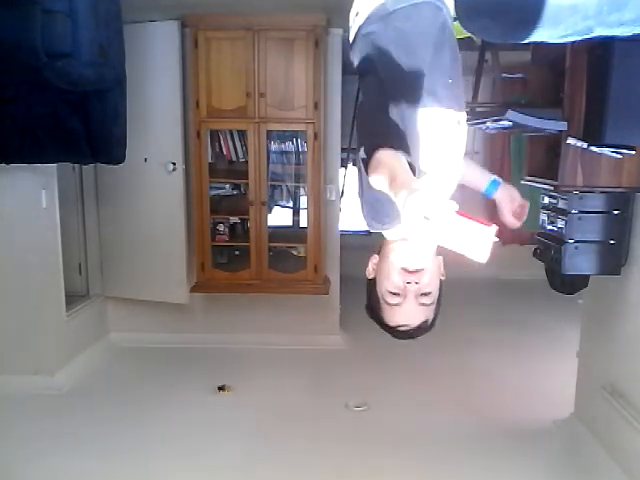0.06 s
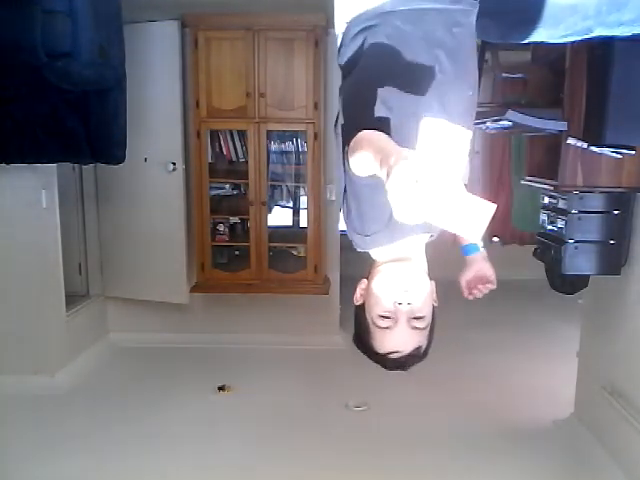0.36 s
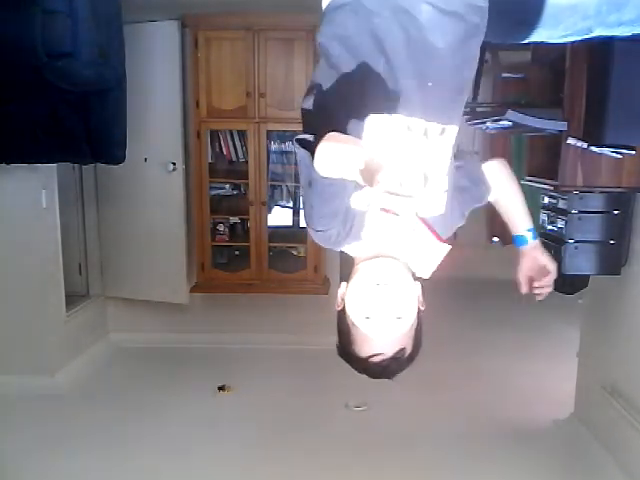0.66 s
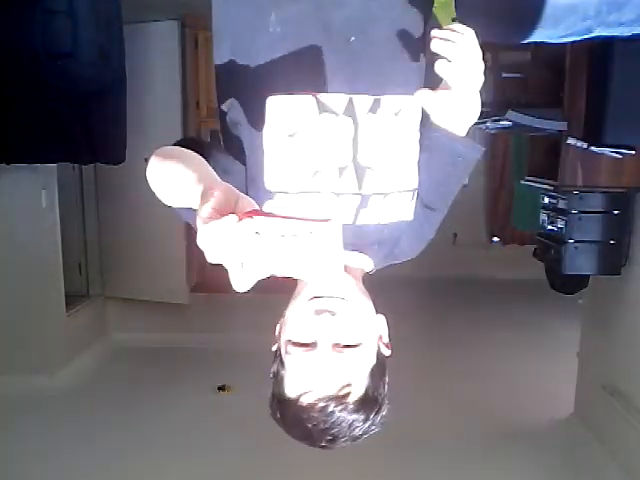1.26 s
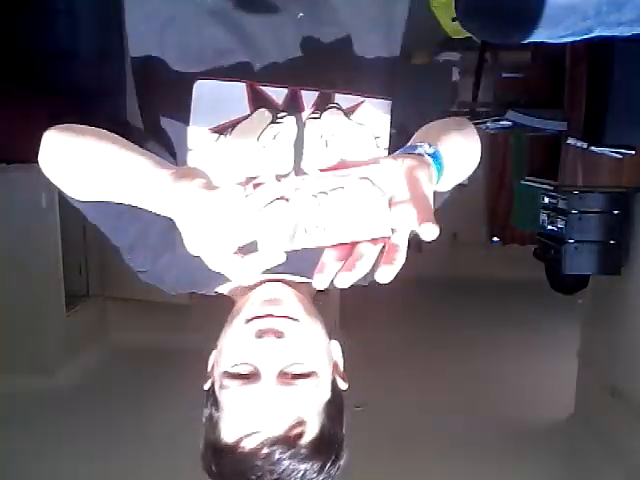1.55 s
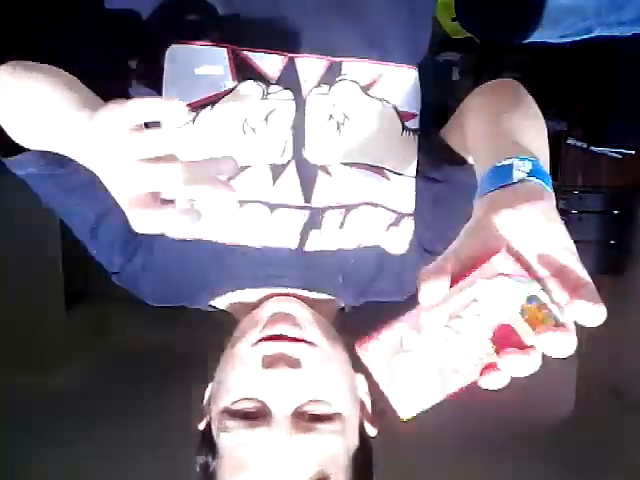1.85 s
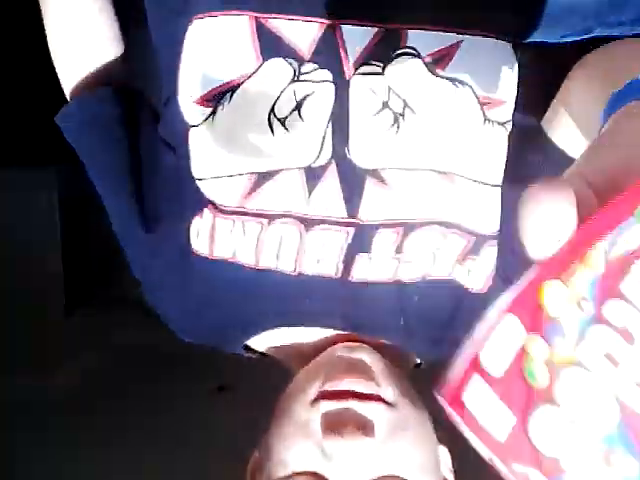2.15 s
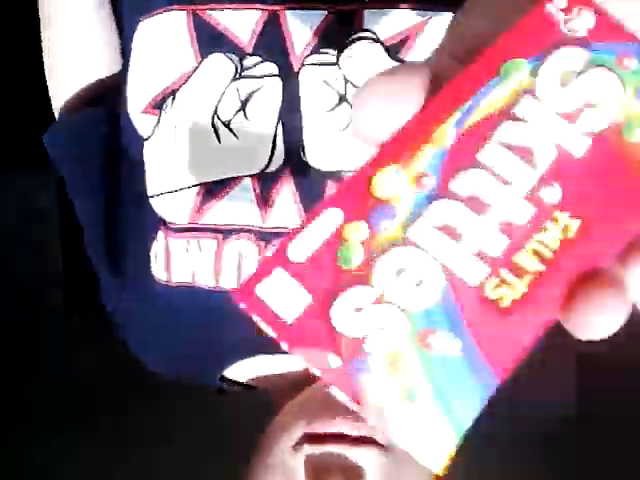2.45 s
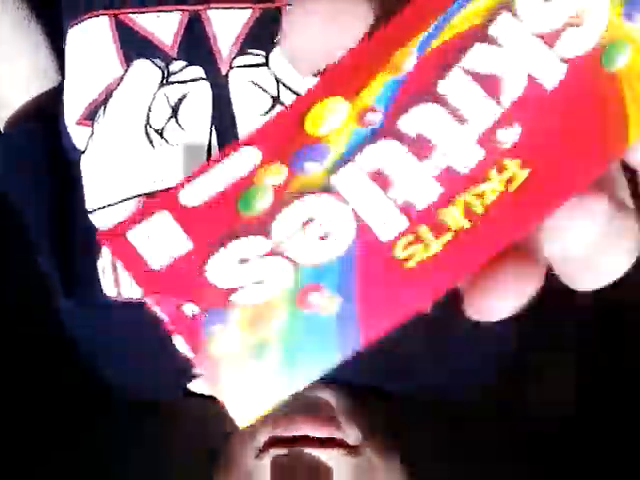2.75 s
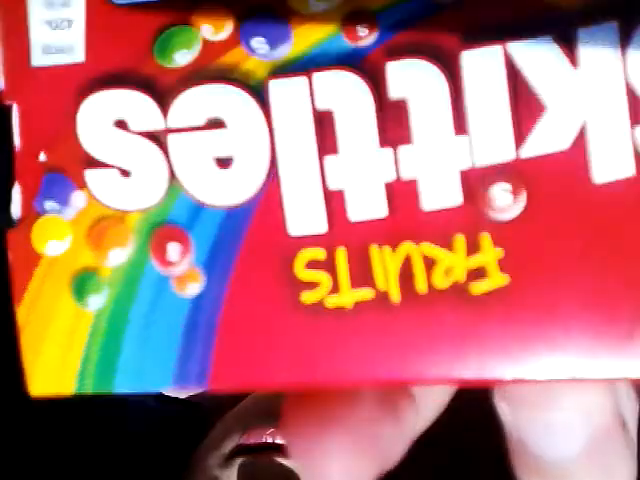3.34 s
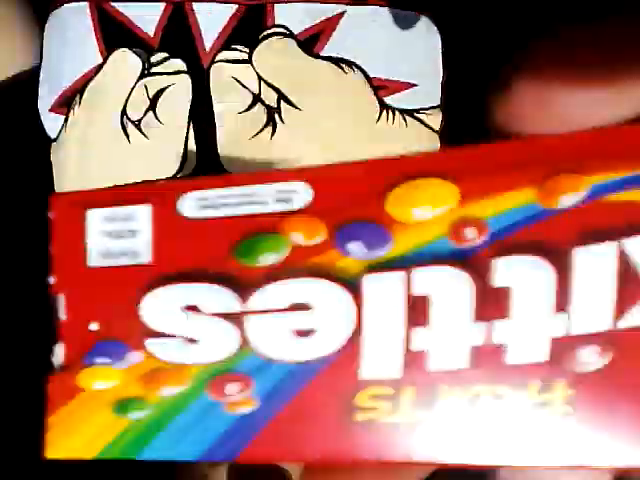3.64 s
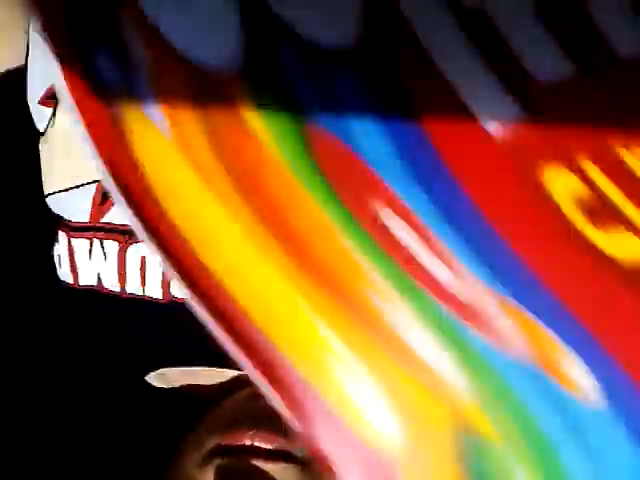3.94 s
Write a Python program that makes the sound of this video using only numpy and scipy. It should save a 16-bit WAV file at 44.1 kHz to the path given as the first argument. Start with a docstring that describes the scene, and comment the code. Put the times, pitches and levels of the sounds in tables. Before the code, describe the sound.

Small hard candies rattle in a shaken cardboard box, distant at first, then loud and close.

```python
"""A faint hiss in a quiet room fades as a cardboard box of small hard candies starts to rattle.
Each stroke lands the candies on a wall in a swarm of tiny impacts; strays tick between strokes,
single candies knock hard, and now and then a panel rings hollow. The box starts across the room,
comes close to the microphone, is tipped so that the candies tumble and clink, and is shaken again."""
import sys
import numpy as np
from scipy import signal
from scipy.fft import rfft, irfft, next_fast_len
from scipy.io import wavfile
from scipy.ndimage import uniform_filter1d, map_coordinates

SR = 44100
rng = np.random.default_rng(int(sys.argv[2]) if len(sys.argv) > 2 else 0)


def to_wav(s):
    """Save 16-bit WAV."""
    ch = np.atleast_2d(s).T  # columns
    pcm = np.round(np.clip(ch, -1, 1) * 32767)  # PCM
    wavfile.write(sys.argv[1], SR, pcm.astype(np.int16))


N = 176400
SIZE, LEAD = 16384, 5292  # samples in one event, and before its centre
HZ = np.fft.rfftfreq(SIZE, 1 / SR)


def amp(db):
    """Decibels to gain."""
    return 10 ** (np.asarray(db) / 20)


def unit(x):
    """Scale to rms 1."""
    return x / np.sqrt(np.mean(np.abs(x) ** 2) + 1e-20)


def along(points, hz):
    """Read (Hz, value) points on a log frequency axis."""
    freqs, values = np.transpose(points)
    return np.interp(np.log(hz + 1), np.log(freqs + 1), values)


def filtered(x, response):
    """Filter x by a gain that depends on frequency."""
    size = next_fast_len(N + SR // 2)
    return irfft(rfft(x, size) * response(np.fft.rfftfreq(size, 1 / SR)), size)[:N]


def noise(spectrum):
    """Coloured noise of rms 1."""
    return unit(filtered(rng.standard_normal(N), lambda hz: amp(along(spectrum, hz))))


def causal(gain):
    """The minimum-phase response with this gain."""
    cepstrum = irfft(np.log(np.maximum(gain, 1e-6)))
    cepstrum[1:SIZE // 2] *= 2
    cepstrum[SIZE // 2 + 1:] = 0
    return np.exp(rfft(cepstrum))


def tails(t60s, count, window):
    """Noise tails of energy 1 in which each frequency dies at its own speed."""
    hz, t, bands = signal.stft(rng.standard_normal((count, SIZE)), SR, nperseg=window)
    decay = amp(-60 * t / along(t60s, hz)[:, None])
    x = signal.istft(bands * decay, SR, nperseg=window)[1][:, :SIZE]
    return x / np.linalg.norm(x, axis=1, keepdims=True)


def add(track, sound, s):
    """Mix in a sound whose centre, LEAD samples in, falls at time s."""
    start = round(s * SR) - LEAD
    part = sound[max(-start, 0):N - start]
    track[max(start, 0):][:len(part)] += part


def flicker(x, depth_db=3.5, per_s=22):
    """Each band of x wavers in level on its own."""
    bands = signal.stft(x, nperseg=256)[2]
    band, frame = np.indices(bands.shape)
    waver = map_coordinates(rng.standard_normal(bands.shape), [band / 6, frame * 128 / SR * per_s])
    return unit(signal.istft(bands * amp(depth_db * waver), nperseg=256)[1][:N])


# Room tone and hiss at the microphone. Each row: frequency in Hz, relative level in dB.
ROOM_TONE = [(25,-7),(100,11.5),(200,-1),(500,-24),(5000,-8),(8000,-17),(15000,-27)]
HISS = [(240,-23.5),(2200,-16.5),(3740,-14.5),(4800,-2.5),(5700,-14),(6700,-12.5),(8700,-30),(13700,-19.5),(15500,-44)]
# The fade of the hiss. Each row: time in seconds, level in dB.
HISS_FADE = [(0,-50.5),(0.141,-55.5),(.18,-59),(.37,-55),(.55,-94)]


def background():
    """The quiet room's low rumble, and a faint flickering hiss that fades as the shaking starts."""
    hiss_db = np.interp(np.arange(N) / SR, *np.transpose(HISS_FADE))
    return amp(-72) * noise(ROOM_TONE) + amp(hiss_db) * flicker(noise(HISS))


# The ring of the cardboard. Each row: frequency in Hz, seconds to fall 60 dB.
WALL_RING = [(200, 0.059), (800, 0.017), (2500, 0.022), (7000, 0.018)]
SPOTS = 8  # spots of wall shared by one swarm, or by all the knocks


def wall_spots(count=40, snap_energy=0.18, colour_db=3.5):
    """Spectra of spots on the cardboard: a snap and a short ring, each with its own peaks and dips."""
    ring = tails(WALL_RING, count, window=64)
    ring[:, 0] += np.sqrt(snap_energy)
    pitch_axis = 9 * np.log2(1 + HZ / 1200)
    ripples = rng.standard_normal((count, 42))
    ripples -= uniform_filter1d(ripples, size=5)  # no broad tilt
    colours = [causal(amp(colour_db * map_coordinates(row, [pitch_axis]))) for row in ripples]
    return np.array([unit(spot) for spot in rfft(ring) * colours])


# The box across the room, near the microphone, tipped, and close up.
# Each row: frequency in Hz, relative level in dB.
FAR = [(35, -53), (60, -28.5), (187, -23), (343, -7), (453, -12), (613, -0.5), (1670, -2), (2410, -2),
       (4850, -13.5), (6560, -15), (15500, -61.5)]
NEAR = [(30, -47.5), (156, -23), (277, -14.5), (400, -9), (600, -1), (1080, -4), (1550, -4.5), (2300, -1.5),
        (4090, -12.5), (6540, -18.5), (8280, -27.5), (11000, -35), (15500, -54)]
TIPPED = [(40,-44),(240,-14.5),(620,-4),(1200,-2.5),(1550,-7),(2300,-2.5),(3400,-10.5),(4500,-11.5),(5400,-15),(7200,-25),(9000,-37.5),(15500,-57)]
CLOSE = [(30, -41.5), (350, -15.5), (639, -6), (1140, -2), (1590, -6), (2180, 0.5), (2760, 0), (3070, -7),
         (5890, -14), (7080, -17.5), (9190, -30.5), (15500, -52)]
# Where and how the box is held; tipped, the candies land more sparsely. Each row: one of the
# colours above, room level in dB, impacts per second, box resonance in Hz, its lift in dB.
HOLDS = [ (FAR, -8, 1500, 890, 3.6), (FAR, -9.5, 1500, 772, 8.3), (TIPPED, -10.5, 400, 2500, 13.6),
         (NEAR, -17, 1700, 1220, 3.7), (TIPPED, -17, 470, 2730, 7.2), (CLOSE, -17, 1500, 1300, 1.1)]
# Each entry: start of a hold in seconds.
HOLD_STARTS = [0, 1.28, 1.8, 2.0, 3.05, 3.7]


def hold(s):
    """How the box is held at time s."""
    return HOLDS[np.searchsorted(HOLD_STARTS, s) - 1]


# The room's reverberation. Each row: frequency in Hz, seconds to fall 60 dB.
ROOM_DECAY = [(150, 0.6), (1000, 0.32), (4000, 0.32), (12000, 0.2)]


def in_room(direct, s):
    """The room answers 5 ms after the direct sound, more strongly when the box is far away."""
    room_db = hold(s)[1]
    response = amp(room_db) * np.pad(tails(ROOM_DECAY, count=1, window=256)[0], (SR // 200, 0))
    response[0] = 1
    return signal.fftconvolve(direct, response)


def box_sound(blows, s, treble_db, bass_db, treble_hz=4000, bass_hz=600, width_hz=90):
    """A spectrum of blows sounds through the box into the room; the grip moves the resonance."""
    colour, _, _, box_hz, lift_db = hold(s)
    resonance = lift_db / (1 + (2 * (HZ - box_hz) / width_hz) ** 2)
    treble = treble_db * HZ ** 2 / (HZ ** 2 + treble_hz ** 2)
    bass = bass_db * bass_hz ** 2 / (HZ ** 2 + bass_hz ** 2)
    box = causal(amp(along(colour, HZ) + resonance + treble + bass))
    return in_room(irfft(unit(blows * box)), s)


# Hard knocks, loudest close to the microphone. Each row: start in seconds, relative level in dB.
KNOCKS = [(0.247,-35),(.288,-24.5),(0.55,-18),(.861,-25),(1.311,-23),(1.449,-15),(1.606,-13),(1.817,-27),(2.022,-2.5),(2.111,-1.5),(2.162,-12.5),(2.196,-10),(2.374,-15.5),(2.399,2),(2.456,-6),(2.577,-10),(2.736,-5),(2.764,-4),(2.803,-10),(2.832,-16),(2.977,-10.5),(3.585,-24.5),(3.66,-16.5),(3.728,-16.5),(3.758,-3),(3.819,-4),(3.851,1),(3.920,2),(3.931,4.5),(3.977,-6.5)]


def knocks(spots, gain_db=7):
    """One candy strikes one spot of the wall."""
    out = np.zeros(N)
    delay = np.exp(-2j * np.pi * HZ * LEAD / SR)
    for s, db in KNOCKS:
        blow = spots[rng.integers(SPOTS)] * delay
        add(out, amp(db + gain_db) * box_sound(blow, s, treble_db=-3.5, bass_db=-18.5), s)
    return out


def swarm(rise_ms, fall_ms, per_s, spots, count=400, stray_share=0.25, stray_db=-7.5, spread_db=5.5):
    """Candies land at random moments on a few spots, hardest in the thick of the swarm; some straggle."""
    slot = np.arange(count) - count // 2
    t = (slot + rng.uniform(-1, 1, count)) / per_s
    offset = 1000 * t / np.where(t < 0, rise_ms, fall_ms)
    stray_offset = offset / np.where(t < 0, 2.24, 1.95)  # strays spread about twice as wide
    strays = (rng.random(count) < stray_share) * amp(stray_db) * np.exp(-stray_offset ** 2 / 2)
    force = np.exp(-offset ** 2 / 2) + strays
    force *= amp(spread_db * np.minimum(rng.standard_normal(count), 1.5))
    force *= rng.choice([-1, 1], count)
    at = np.round(t * SR).astype(int) + LEAD
    blows = np.zeros((SPOTS, SIZE))
    np.add.at(blows, (rng.integers(SPOTS, size=count), np.clip(at, 0, SIZE - 1)), force * (at > 0))
    struck = spots[rng.permutation(len(spots))[:SPOTS]]
    return np.sum(rfft(blows) * struck, axis=0)


# Strokes, across the room at first and near the microphone from 2 s. Each row: thick of the swarm
# in seconds, relative level in dB, rise in ms, fall in ms, treble shelf in dB.
STROKES = [(.264,-42,6.9,2.4,19),(.339,-34,18,23,7.5),(0.407,-29,7.1,7,11),(.477,-44,4.6,10.5,10),
           (.545,-37,10.7,5.7,-7),(0.579,-34,20,9.5,-1),(0.644,-34,22,18.6,5),(.720,-32,14.5,12.5,1.5),(.784,-28.5,14.6,6,0),(.868,-26,12.4,9.4,-3),
           (.942,-29.5,11,18.7,3),(1.031,-33.5,11.5,9.2,-3),(1.09,-34,17.7,12,-3),(1.169,-36.5,18.5,9.1,1),(1.229,-34.5,10.7,15.7,-1.5),
           (1.314,-30,9.9,7.8,-1),(1.383,-32.5,14.5,17,2),(1.473,-29,11,11.6,-2.5),(1.538,-32,14,10.4,1.5),(1.618,-28,7,7.5,-3.5),(1.737,-33,9.2,7.3,1.5),
           (1.906,-49,29,20,-10.5),(1.985,-36.5,4.3,4.2,1),
           (2.030,-19.5,7.3,13,6),(2.117,-21,12,12,11.5),(2.216,-13,7,8.1,12),(2.298,-17,16.4,15.7,7.5),(2.407,-13.5,5.6,13,7.5),(2.483,-15.5,10.8,14.8,5),
           (2.586,-13.5,10.7,11,2),(2.658,-16.5,16,14.8,2.5),(2.761,-18,14,6.4,4),(2.833,-20,11,10.6,-4),(2.870,-27.5,8.4,2.5,5.5),(2.919,-22.5,17.6,10,-6.5),(3.003,-21.5,18.7,10.6,-4),
           (3.086,-27,26,18,-1),(3.205,-33.5,26,10.4,-15.5),(3.246,-31,17,25,-1),(3.274,-28.5,5.3,6.9,-9),(3.336,-31,33,19.5,0.5),(3.411,-32.5,13,32,12.5),(3.439,-30,2.2,6.8,4),
           (3.513,-39,14,19,-2),(3.545,-40.5,5.9,8.1,-2),(3.659,-41.5,21,15,4.5),
           (3.758,-20.5,21,17.3,-8.5),(3.830,-17.5,5.4,8.3,4),(3.857,-17.5,7.2,9.3,0),(3.927,-15,21,21,-8),(3.977,-21,13,7.9,-20)]


def shakes(spots):
    """Every stroke throws the candies against a wall; a longer swarm carries more energy."""
    out = np.zeros(N)
    for s, db, rise_ms, fall_ms, treble_db in STROKES:
        length = (rise_ms + fall_ms) * SR / 1000
        blows = swarm(rise_ms, fall_ms, per_s=hold(s)[2], spots=spots)
        add(out, amp(db) * np.sqrt(length) * box_sound(blows, s, treble_db, bass_db=-0.5), s)
    return out


# Panel notes, straight to the microphone. Each row: start in seconds, pitch in Hz, level in dB.
PANEL_RINGS = [(0.986,344,-31.5),(1.466,736,-22.5),(1.529,740,-26.5),(2.026,660,-16),(2.583,580,-24),(2.757,774,-13)]


def panels(t60_s=0.039, attack_s=0.00057):
    """A struck panel of the box gives a short hollow note; the grip decides its pitch."""
    out, t = np.zeros(N), np.arange(SIZE) / SR
    for s, hz, db in PANEL_RINGS:
        envelope = amp(db - 60 * t / t60_s) * (1 - np.exp(-t / attack_s))
        add(out, np.pad(envelope * np.sin(2 * np.pi * hz * t), (LEAD, 0)), s)
    return out


# The modes of a clink. Each row: frequency in Hz, relative level in dB.
CLINK_MODES = [(2730,0),(3950,-5.5),(4600,-5.5)]
# Clinks in the tipped box, mostly near the microphone. Each row: start in seconds, level in dB.
CLINKS = [(1.981,-43),(3.065,-22),(3.242,-19),(3.270,-23.5),(3.333,-30),(3.405,-23.5),(3.436,-27)]


def clinks(t60_s=0.042, attack_s=0.0006, detune=0.008, spread_db=2):
    """A tumbling candy lands with a small bright ring, a little different each time."""
    out, t = np.zeros(N), np.arange(SIZE) / SR
    hz, mode_db = np.transpose(CLINK_MODES)[:, :, None]
    for s, db in CLINKS:
        pitch_draw, level_draw = rng.standard_normal((2, len(hz), 1))
        tuned_hz = hz * (1 + detune * pitch_draw)
        modes = amp(mode_db + spread_db * level_draw) * np.sin(2 * np.pi * tuned_hz * t)
        envelope = amp(db - 60 * t / t60_s) * (1 - np.exp(-(t / attack_s) ** 2))
        add(out, in_room(np.pad(envelope * modes.sum(axis=0), (LEAD, 0)), s), s)
    return out


def scene():
    """The rattling box in the room, in mono."""
    spots = wall_spots()
    return (shakes(spots) + knocks(spots) + clinks() + panels() + background())[None]


# The microphone's response. Each row: frequency in Hz, gain in dB.
MIC = [(7400,-0.5),(8700,-5)]
TOP_HZ = 15700


def record(dry):
    """The microphone's treble drops in a step near 8 kHz and ends at its band limit."""
    return filtered(dry[0], lambda hz: amp(along(MIC, hz)) * (hz < TOP_HZ))[None]


dry = scene()
out = record(dry)
to_wav(out)
```